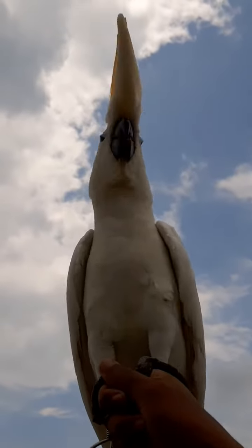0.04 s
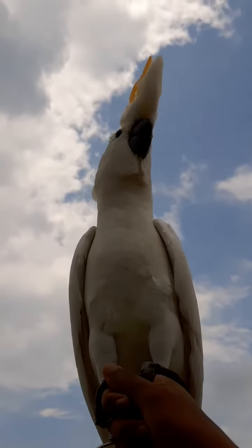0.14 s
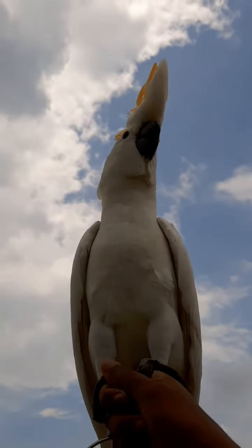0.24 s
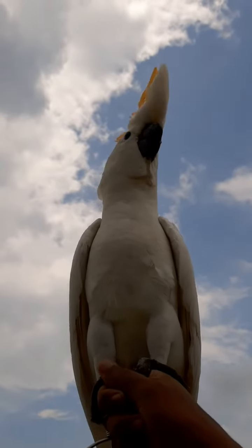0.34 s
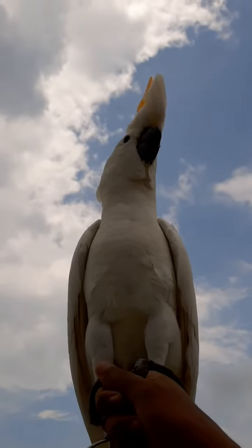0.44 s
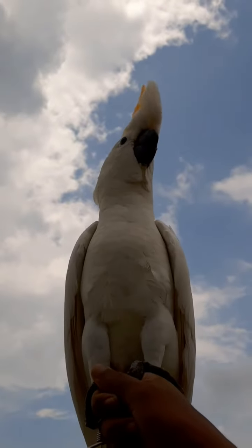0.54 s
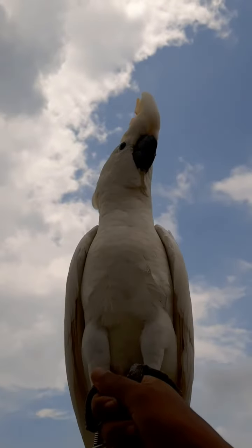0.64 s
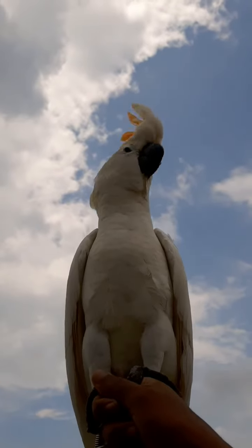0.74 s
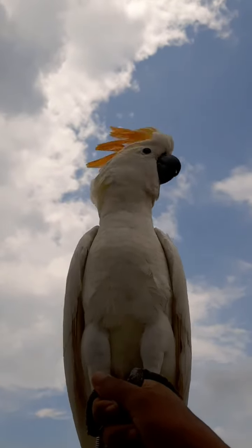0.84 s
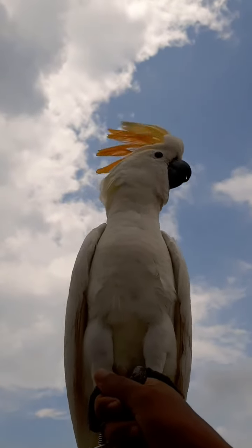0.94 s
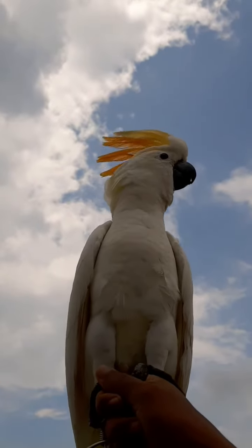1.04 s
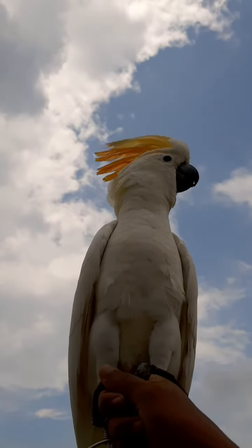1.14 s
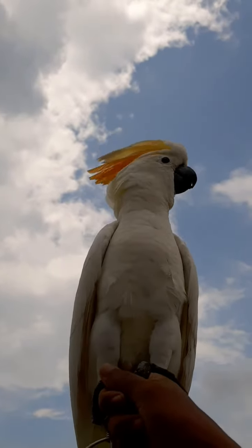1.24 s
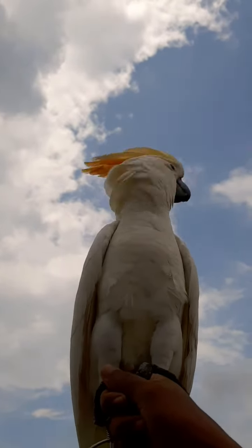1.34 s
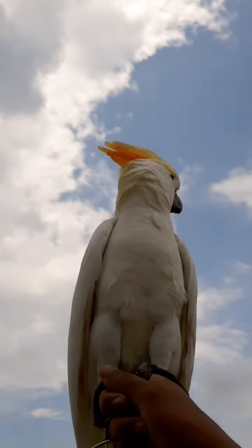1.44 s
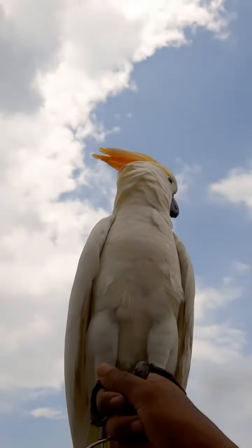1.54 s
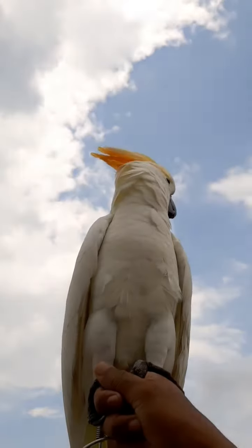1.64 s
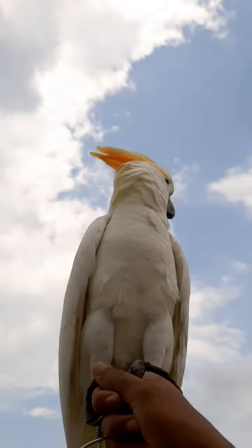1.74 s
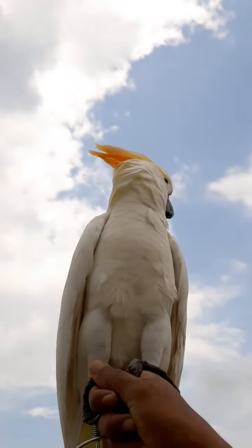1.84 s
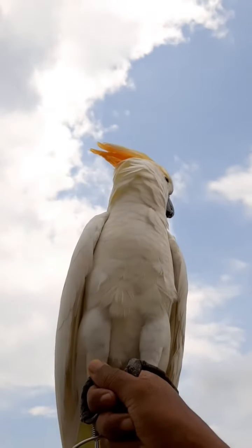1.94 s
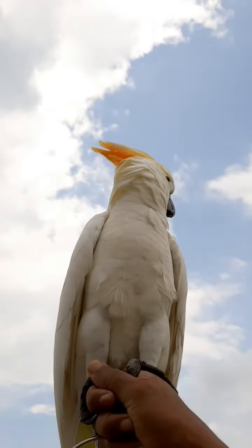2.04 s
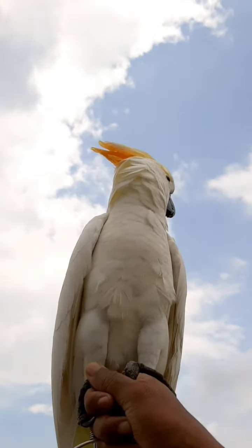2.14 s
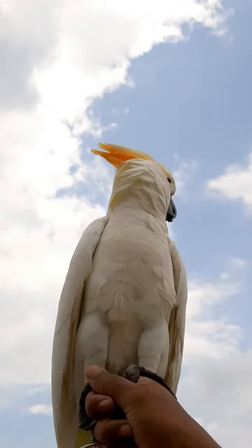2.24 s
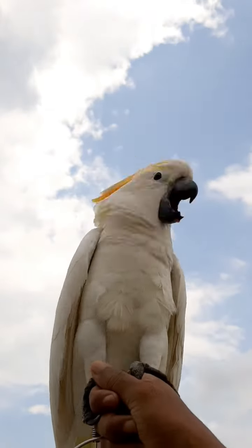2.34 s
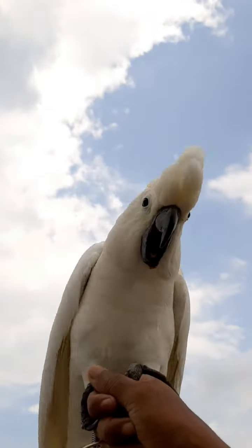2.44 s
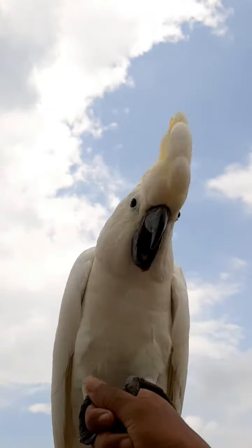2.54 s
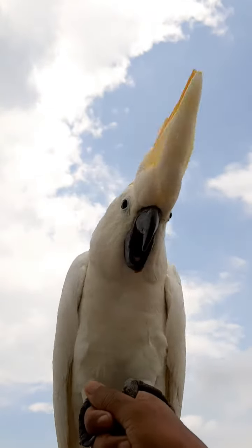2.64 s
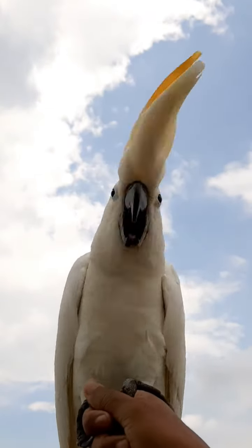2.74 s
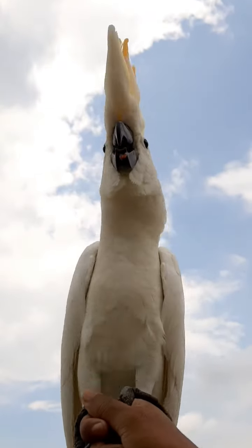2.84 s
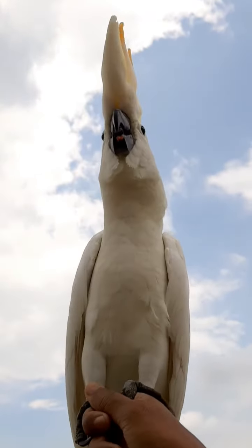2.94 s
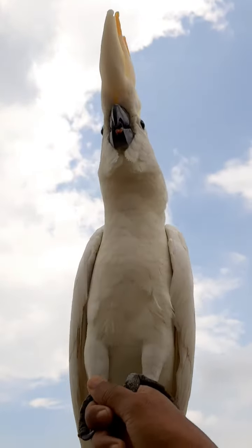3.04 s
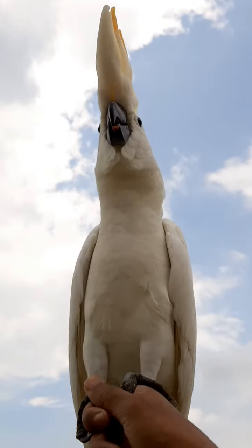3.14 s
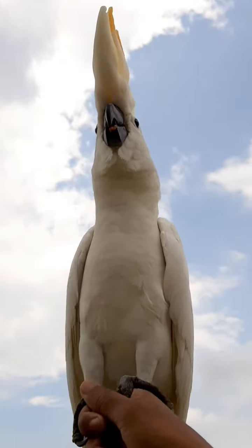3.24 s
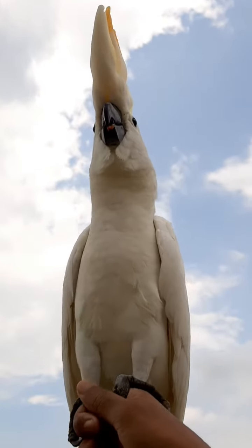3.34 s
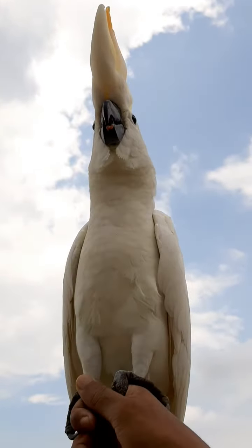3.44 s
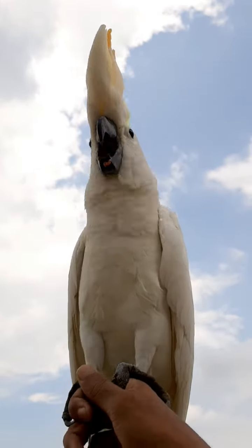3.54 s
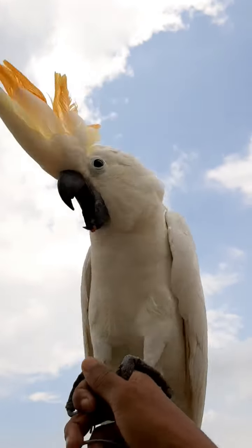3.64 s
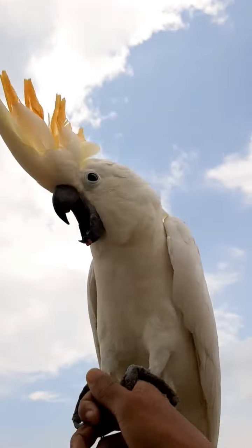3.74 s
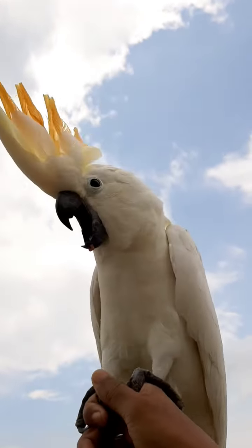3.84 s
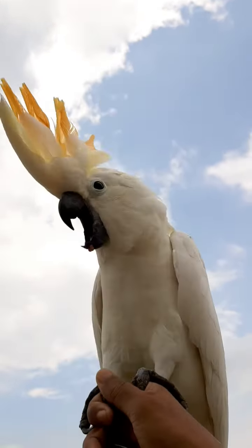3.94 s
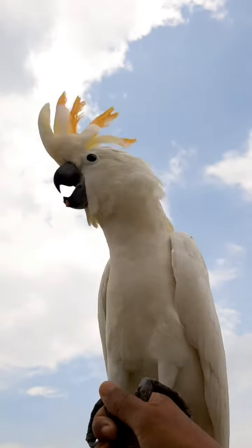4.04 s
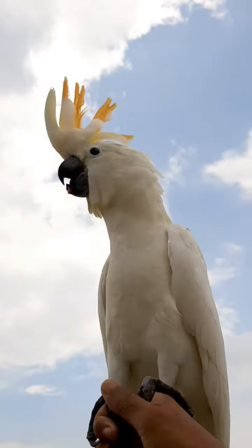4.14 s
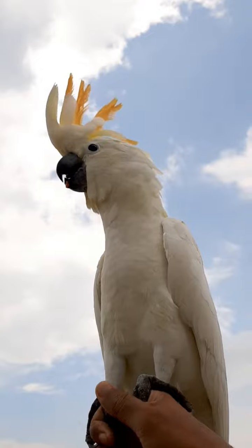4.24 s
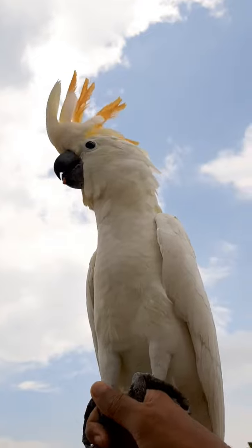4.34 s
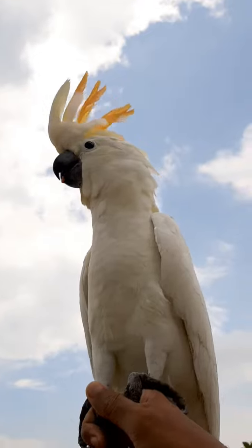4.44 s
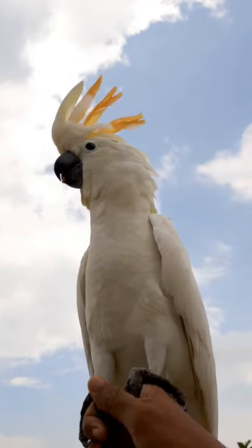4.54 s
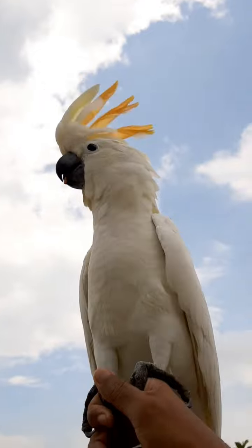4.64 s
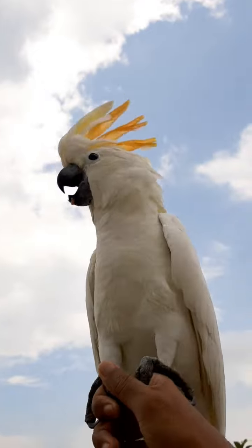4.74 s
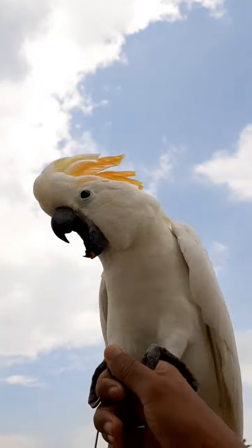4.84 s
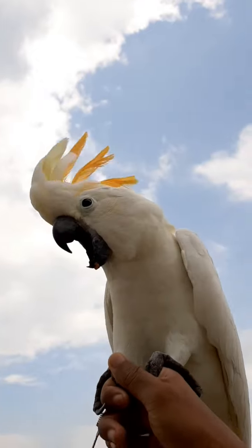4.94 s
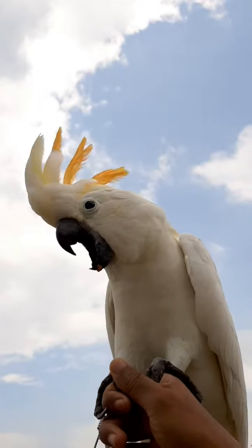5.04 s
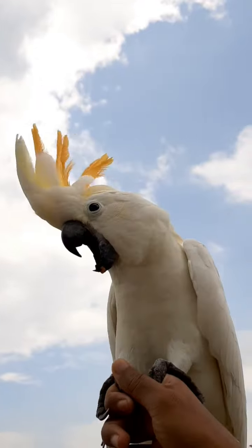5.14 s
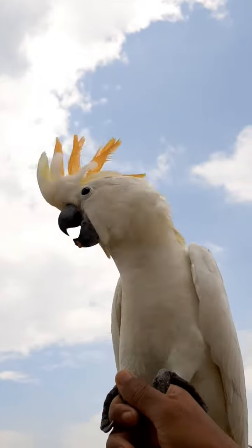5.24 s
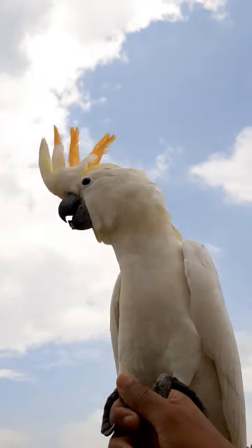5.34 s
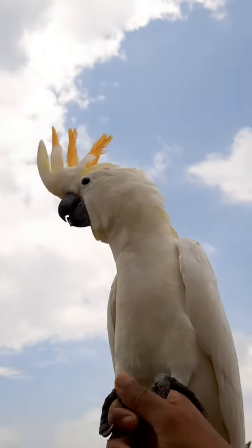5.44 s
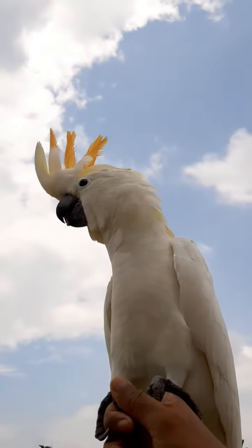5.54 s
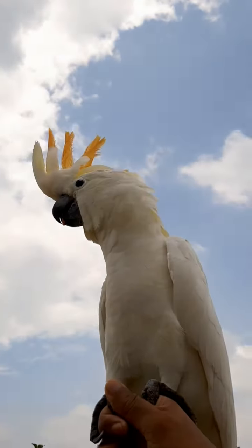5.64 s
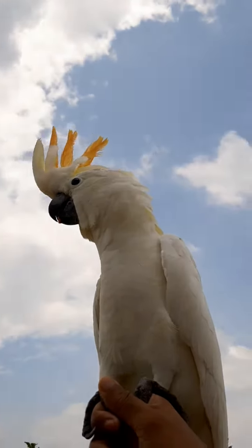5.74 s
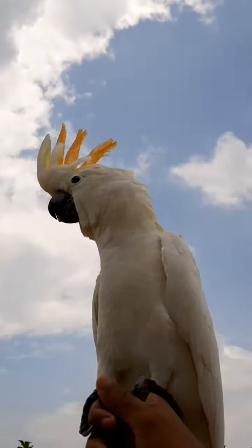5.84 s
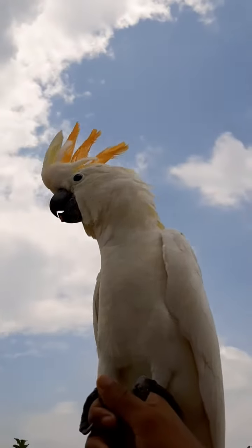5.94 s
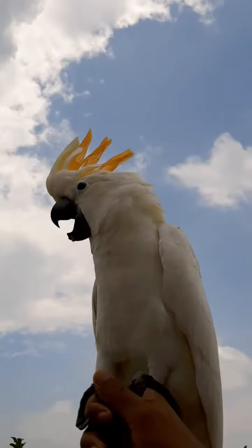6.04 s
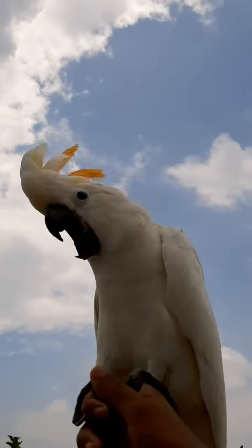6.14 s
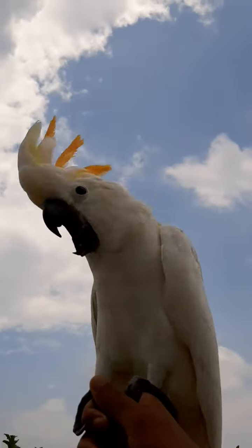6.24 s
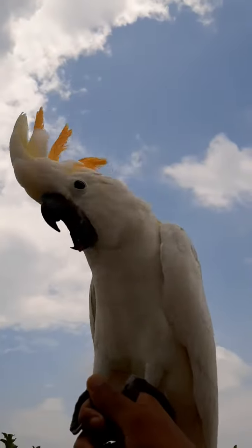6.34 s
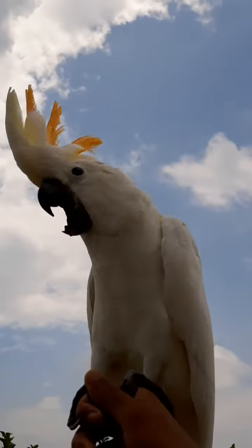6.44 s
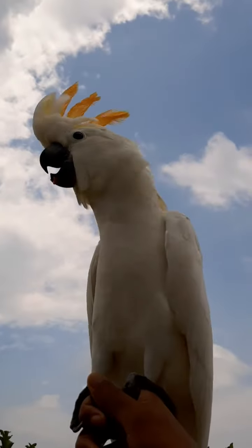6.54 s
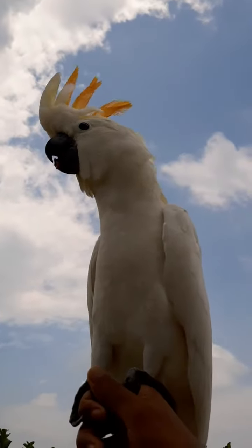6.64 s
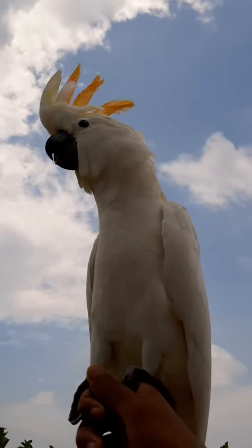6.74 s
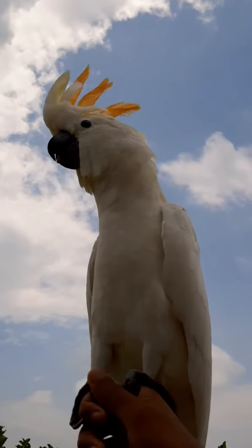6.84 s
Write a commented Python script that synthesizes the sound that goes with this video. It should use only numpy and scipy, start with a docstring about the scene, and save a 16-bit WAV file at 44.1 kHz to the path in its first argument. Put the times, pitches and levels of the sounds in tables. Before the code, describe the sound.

Four loud, shrill cockatoo screeches come at a steady pace outdoors, with thin birdsong far behind.

```python
"""Cockatoo screaming outdoors

A cockatoo on a hand screams four times, close to the microphone: its syrinx warbles and tears into a
rasp at every pitch dip. Each rasp shakes a low rumble out of the microphone ports, and nearby walls
answer briefly. Behind it sit thin whistles, chips and wheezes of small birds, two far hoots, a soft
knock and a quiet bed of outdoor air."""
import sys
import numpy as np
from scipy import signal
from scipy.fft import rfft, irfft, next_fast_len
from scipy.io import wavfile
from scipy.ndimage import map_coordinates

SR = 44100
rng = np.random.default_rng(int(sys.argv[2]) if len(sys.argv) > 2 else 0)


def master_out(mix):
    """Clip the mix to full scale and print it as 16-bit PCM to the path in sys.argv[1]."""
    frames = np.transpose(np.atleast_2d(mix))
    ceiling = np.clip(frames, -1, 1)
    pcm = np.round(ceiling * 32767).astype(np.int16)
    wavfile.write(sys.argv[1], SR, pcm)


N = 303408
T = np.arange(N) / SR

# fader rides of the air bed: (time [s], drone level [dB], rustle level [dB])
AIR_LEVELS = [(0, -68, -64.5), (1.0, -67, -62), (2.45, -58, -51), (2.9, -69, -61), (3.5, -69.5, -59),
              (4.6, -65.5, -63.5), (6.88, -71.5, -64)]
# colours of the air bed's three layers: (frequency [Hz], relative level [dB])
DRONE_COLOUR = [(20, -28), (40, -22), (66, 4), (95, 0), (330, -12), (650, -38)]
RUSTLE_COLOUR = [(200, -6), (400, 2.5), (850, -1.5), (1500, -5.5), (2600, -11.5), (4300, -9), (9000, -35)]
HISS_COLOUR = [(1500, -29), (4000, -9.5), (6500, -4), (9000, -25.5), (12500, -8.5)]
# modes of the knock: (frequency [Hz], level [dB], t60 [s])
KNOCK_MODES = [(503, -46, 0.025), (1020, -29.5, 0.0035), (1400, -40.5, 0.019), (3700, -41.5, 0.0052)]
# far hoots: (time [s], length [s], starting pitch [Hz], crest level [dB])
FAR_HOOTS = [(1.479, 0.78, 675, -56), (3.05, 0.46, 751, -65.5)]
# whistled phrases: (time [s], notes [count], note spacing [s], pitch [Hz], base level [dB])
WHISTLE_PHRASES = [(0, 2, 0.11, 7290, -60.5), (.421, 3, 0.13, 7280, -60.5), (1.179, 3, .14, 7340, -64),
                   (2.189, 2, 0.15, 6756, -53), (2.879, 5, 0.17, 7273, -58.5),
                   (4.228, 5, .155, 7290, -62.5), (5.438, 5, .172, 7240, -63), (6.7, 1, 0.11, 7150, -63.5)]
# pairs of short arched chips: (time [s], level [dB])
CHIP_PAIRS = [(.36, -76.5), (.77, -72), (1.175, -67.5), (1.595, -64), (2.02, -64)]
# wheezy far calls: (time [s], length [s], pitch [Hz], fall [share of pitch], base level [dB])
WHEEZE_CALLS = [(1.145, 0.54, 4070, 0.0062, -59.5), (1.148, .18, 5320, .02, -63),
                (1.18, 0.41, 8200, 0.039, -66.5), (1.34, .25, 6100, 0.068, -67),
                (5.425, .48, 4280, 0.00017, -60), (5.855, .34, 4250, .058, -60),
                (6.095, 0.19, 3500, -.2, -52)]
# decay of the outdoor tail: (frequency [Hz], t60 [s])
YARD_DECAY = [(200, .25), (2500, 0.57), (6000, 0.61), (12000, 0.58)]
# EQ on the voice sent to the wall echo: (frequency [Hz], gain [dB])
WALL_SEND_EQ = [(2200, -0.5), (2700, -4.5), (3350, -12.5), (3800, -1), (4300, -2)]
# narrow resonances of things near the microphone: (frequency [Hz], gain [dB])
NEAR_RESONANCES = [(2036, 5.5), (2269, 4.5), (3213, -30.5), (3716, -4.5), (4626, -16.5), (5137, 6)]
# balance of the microphone ports: (frequency [Hz], left minus right [dB])
PORT_BALANCE = [(200, 3.5), (1500, 0.5), (2300, -4.5), (2850, -7.5), (3300, 0), (4000, 3.5), (5700, -2.5),
                (6700, -1), (7400, 9), (8100, 20.5), (10000, -0.5)]
# phase of the direct sound at the ports: (frequency [Hz], left lead [rad])
PORT_PHASE = [(1500, 0.22), (2050, 0.52), (2300, 1.97), (2700, 2.22), (3150, 3), (3700, 2.96), (4300, 3.6),
              (5000, 1.12), (5500, 2.9), (6500, 2.23)]
# sound that reaches the ports off the hand and body: (frequency [Hz], share of power [0-1])
SCATTER_SHARE = [(1500, 0.11), (3300, 0.017), (4600, 0.58), (5600, 0.12), (7000, 0.68), (12000, 1)]
# colour of the ports' rumble: (frequency [Hz], relative level [dB])
RUMBLE_COLOUR = [(20, -20.5), (70, -1), (250, -3.5), (500, -10.5), (1000, -15), (1800, -32)]
# formants of the throat and open beak: (frequency [Hz], relative level [dB])
THROAT_FORMANTS = [(450, -31), (750, -13.5), (1150, -16), (1500, -6), (1850, -9), (2400, -4.5), (2750, 6),
                   (3050, 3), (3550, -1.5), (4200, -3.5), (4650, -14), (5300, -8), (5900, -7), (6450, -12),
                   (7200, -12.5), (8700, -33), (12000, -19.5)]
# the screams; break and crest count from each one's start: (time [s], length before release [s],
# base level [dB], opening pitch [Hz], attack [s], break into rasp [s], first warble crest [s],
# warble rate [Hz], opening roughness [0-1], closing roughness [0-1])
SCREAM_CUES = [(2.479, 0.38, -15.5, 1437, 0.022, 0.099, 0.12, 11.7, .16, 0.38),
               (3.719, .36, -16, 1526, 0.031, 0.039, 0.098, 11.2, 0.27, 0.3),
               (4.944, .373, -16, 1506, 0.043, .05, .117, 11, 0.47, 0.36),
               (6.194, 0.37, -17, 1430, 0.049, .045, 0.11, 11.25, 0.38, 0.59)]


def amp(db):
    """Decibels to gain."""
    return 10 ** (np.asarray(db) / 20)


def unit(x):
    """Scale to rms 1."""
    return x / np.sqrt(np.mean(x ** 2) + 1e-20)


def ramp(t, length):
    """Rise from 0 to 1 as t goes from 0 to length."""
    return np.clip(t / length, 0, 1)


def along(points, hz):
    """Read (frequency, value) points on a log axis."""
    f, v = np.transpose(points)
    return np.interp(np.log(hz + 1), np.log(f + 1), v)


def wobble(rate, t):
    """A smooth random curve with rate knots a second."""
    at = (t - t[0]) * rate
    return map_coordinates(rng.standard_normal(int(at[-1]) + 4), [at], mode="mirror")


def running_phase(hz):
    """Phase in radians of a gliding frequency."""
    return 2 * np.pi * np.cumsum(hz) / SR


def filtered(x, response):
    """Pass x through a frequency response."""
    n = x.shape[-1]
    m = next_fast_len(n + 8192)
    return irfft(rfft(x, m) * response(np.fft.rfftfreq(m, 1 / SR)), m)[..., :n]


def coloured(x, spectrum):
    """Shape x with an EQ curve, then scale to rms 1."""
    return unit(filtered(x, lambda hz: amp(along(spectrum, hz))))


def add(track, start, x):
    """Mix x into track from start seconds on."""
    part = track[..., max(round(start * SR), 0):][..., :x.shape[-1]]
    part += x[..., :part.shape[-1]]


def air(drone_trim_db=1, hiss_db=-73, width=0.85):
    """The bed: a low distant drone, a rustle that swells before the first scream, a faint hiss."""
    times, drone_db, rustle_db = np.transpose(AIR_LEVELS)
    noise = lambda colour: coloured(rng.standard_normal(N) + width * rng.standard_normal((2, N)), colour)
    drone = amp(np.interp(T, times, drone_db) + drone_trim_db + wobble(6.7, T)) * noise(DRONE_COLOUR)
    rustle = amp(np.interp(T, times, rustle_db) + wobble(10, T)) * noise(RUSTLE_COLOUR)
    return drone + rustle + amp(hiss_db) * noise(HISS_COLOUR)


def knock(start=.631):
    """A soft, dead knock close to the microphone: four heavily damped modes."""
    t = T[:SR // 10]
    out = np.zeros(N)
    modes = sum(amp(db - 60 * t / t60) * np.sin(2 * np.pi * hz * t) for hz, db, t60 in KNOCK_MODES)
    add(out, start, modes)
    return out


def hoots(octave_db=-9, swell_db=12, fall_hz_per_s=100):
    """Far, slowly sinking tones with a weak octave, each swelling and fading."""
    out = np.zeros(N)
    for start, length, hz, db in FAR_HOOTS:
        t = np.arange(0, length, 1 / SR)
        phase = running_phase((hz - fall_hz_per_s * t) * (1 + 0.005 * wobble(39, t)))
        level = amp(db + swell_db * (np.sin(np.pi * t / length) - 1) + 2 * wobble(23.7, t))
        add(out, start, level * unit(np.sin(phase) + amp(octave_db) * np.sin(2 * phase)))
    return out


def yard(x, near_db, far_db, near_t60=0.033):
    """Outdoor reverb, wet only: quick close reflections and a faint tail that dies band by band."""
    hz, t, bands = signal.stft(rng.standard_normal((2, SR // 2)), SR, nperseg=256)
    tail = signal.istft(bands * amp(-60 * t / along(YARD_DECAY, hz)[:, None]), SR, nperseg=256)[1]
    near = rng.standard_normal(tail.shape) * amp(-60 * T[:tail.shape[1]] / near_t60)
    impulse = amp(near_db) * near / np.linalg.norm(near[0])
    impulse += amp(far_db) * tail / np.linalg.norm(tail[0])
    return signal.fftconvolve(x[None], impulse, axes=1)


def bird_note(length, hz, fall, arch, tremble=.015):
    """A small bird's note: a gliding, trembling sine under a smooth swell."""
    t = np.arange(0, length, 1 / SR)
    progress = t / length
    glide = fall * (.5 - progress) + arch * (np.sin(np.pi * progress) - 1)
    pitch = hz * (1 + glide + tremble * wobble(700, t))
    return unit(np.sin(running_phase(pitch)) * np.sin(np.pi * progress ** 0.52))


def small_birds(first_note_hz=325, first_note_db=-2.5, chip_gap_s=.145):
    """Falling whistles and wheezes scattered by the trees, and dry pairs of chips."""
    out = np.zeros((2, N))
    for start, notes, spacing, hz, db in WHISTLE_PHRASES:
        for k in range(round(notes)):
            first = k == 0  # a phrase opens higher and softer
            note = bird_note(.18, hz + first_note_hz * first, fall=.07, arch=0)
            note *= amp(db + first_note_db * first)
            add(out, start + k * spacing - .015, yard(note, near_db=0, far_db=-2.5))
    for start, db in CHIP_PAIRS:
        for delay in (0, chip_gap_s):
            add(out, start + delay, amp(db) * bird_note(.055, 3850, fall=.22, arch=.22))
    for start, length, hz, fall, db in WHEEZE_CALLS:
        wheeze = bird_note(length, hz, fall, arch=0.047, tremble=0.0302)
        add(out, start, amp(db) * yard(wheeze, near_db=-4.5, far_db=-8))
    return out


def ringing(x, width_hz=20):
    """Narrow resonances pick up the passing overtones and hold them briefly."""
    peak = lambda hz, centre: 1j * hz * width_hz / (centre ** 2 - hz ** 2 + 1j * hz * width_hz)
    bank = lambda hz: sum(amp(db) * peak(hz, centre) for centre, db in NEAR_RESONANCES)
    return filtered(np.pad(x, (0, SR // 5)), bank)


def ports(x, scatter_t60=0.036):
    """Each microphone port gives the bird its own colour and phase; the treble arrives scattered."""
    bounces = rng.standard_normal((2, SR // 10)) * amp(-60 * T[:SR // 10] / scatter_t60)
    bounces /= np.linalg.norm(bounces, axis=1, keepdims=True)

    def response(hz):
        sides = np.array([[.5], [-.5]])
        gain = amp(sides * along(PORT_BALANCE, hz))
        gain /= np.sqrt(np.mean(gain ** 2, axis=0))
        share = np.clip(along(SCATTER_SHARE, hz), 0, 1)
        direct = np.exp(1j * sides * along(PORT_PHASE, hz))
        scattered = rfft(bounces, 2 * (len(hz) - 1))
        return gain * (np.sqrt(1 - share) * direct + np.sqrt(share) * scattered)
    return filtered(x, response)


def port_rumble(t, level, rough, left_db=-2.5, right_db=-9):
    """The rasp shakes low, lumpy noise out of the microphone ports."""
    thumps = rng.standard_normal((2, len(t))) * amp(2 * wobble(300, t))
    overload = np.clip((t - t[0] - .04) / 0.064, 0.03, 1)  # builds up just after the attack
    return amp([[left_db], [right_db]]) * level * rough ** 2.15 * overload * coloured(thumps, RUMBLE_COLOUR)


def scream_gesture(length, base_db, opening_hz, attack, break_at, crest_at, rate, open_rough, end_rough):
    """Pitch, level and roughness: a rising tone breaks into a rasping warble, settles and is let go."""
    scoop_hz, scoop_s, rise_hz_per_s = 139.9, .02, 600
    warble_hz, swing_hz, warbles, uneven = 1508, 134.8, 2.6, 0.202
    closing_hz, sag_hz_per_s = 1465, 3000
    catch_s, break_s, settle_s, release_s = 0.0363, .025, .028, .04
    catch_rough, crest_rough, dip_rough = .85, .52, 0.833
    onset_db, stutter_db, stutter_s, release_db_per_s = -18.5, 10, .003, 704.5
    clean_db, surge_db, waver_hz, waver_db = 5.5, 0.5, 12.04, 1.08

    t = np.arange(-.012, length + release_s, 1 / SR)
    swing = np.cos(2 * np.pi * (t - crest_at) * rate)
    caught = ramp(t - catch_s / 2, catch_s / 2)
    broken = ramp(t - break_at + break_s / 2, break_s)
    settled = ramp(t - crest_at - warbles / rate, settle_s)
    since_release = np.maximum(t - length, 0)

    def stages(opening, warble, closing):
        """Crossfade through the three parts of the scream."""
        return (1 - settled) * ((1 - broken) * opening + broken * warble) + settled * closing

    hz = stages(opening_hz - scoop_hz * np.exp(-np.maximum(t, 0) / scoop_s) + rise_hz_per_s * t,
                warble_hz + swing_hz * swing * (1 + uneven * wobble(rate, t)),
                closing_hz - sag_hz_per_s * since_release)  # sinks as the pressure goes
    hz += waver_hz * wobble(60, t)
    rough = stages(catch_rough + (open_rough - catch_rough) * caught,
                   dip_rough + (crest_rough - dip_rough) * (1 + swing) / 2,
                   end_rough)
    db = base_db + onset_db * (1 - ramp(t, attack)) ** 2 - release_db_per_s * since_release
    db -= stutter_db * np.exp(-(t / stutter_s) ** 2)  # the voice catches after its first puff
    db += clean_db * (.5 - rough)  # a clean tone is louder than a rasp
    db -= surge_db * stages(0, swing, 0)  # a small push at each pitch dip
    db += waver_db * wobble(50.2, t)
    return t, hz, db, rough


def syrinx(t, hz, db, rough, undertone_db=-8, lock_hz=1440, split=2.3, rattle_hz=220, slack_db=-22):
    """The raw voice: two sets of membranes and their breath noise, shaped by throat and beak."""
    # the harder the membranes are driven, the less alike their cycles
    jitter = rough ** 2 * (.028 * wobble(900, t) + .02 * wobble(280, t))
    main = running_phase(hz * (1 + jitter))
    # the other side is locked an octave below, and breaks away upwards at high pitch
    breakaway_hz = split * np.maximum(hz - lock_hz, 0) * np.clip(2.5 * rough - .3, 0, 1)
    other = main / 2 + running_phase(breakaway_hz + 50 * rough * wobble(300, t))

    def torn(phase, k):
        """A partial that swells and slips on its own; high ones slip more."""
        swell = amp(3.5 * rough * wobble(240, t))
        slip = .45 * k ** 1.35 * rough * wobble(330, t)
        return swell * np.cos(phase + slip)

    # overtones of the main side, and their sum tones with the other
    other_gain = amp(undertone_db) + .4 * rough
    partials = sum(torn(k * main + main, k)
                   + other_gain * torn(k * main + other, k)
                   + .5 * rough * torn(k * main + 2 * other, k) for k in range(9))
    tone = coloured(partials, THROAT_FORMANTS)
    # turbulent air escapes in puffs; its hiss differs from port to port
    hiss = rng.standard_normal(len(t)) + rng.standard_normal((2, len(t)))
    breath = coloured(hiss * (1 + 0.46 * np.cos(other)), THROAT_FORMANTS)
    # at the start and end the pressure is too low for a steady tone
    slack = ramp(slack_db - db, 10)
    breath_share = np.maximum(.2 * rough ** 2, .7 * slack) + .001
    # an uneven rattle splits every overtone into a cluster
    rattle_phase = running_phase(rattle_hz * (1 + .3 * wobble(120, t)))
    rattle = unit(1 + .8 * rough ** 2 * np.cos(rattle_phase))
    return rattle * (np.sqrt(1 - breath_share) * tone + np.sqrt(breath_share) * breath)


def cockatoo(fade_s=0.0097):
    """Four close screams, each with its own randomly drawn brief reflections."""
    out = np.zeros((2, N))
    for cue, *manner in SCREAM_CUES:
        t, hz, db, rough = scream_gesture(*manner)
        level = amp(db) * ramp(np.minimum(t - t[0], t[-1] - t), fade_s)
        voice = level * syrinx(t, hz, db, rough)
        rumble = port_rumble(t, level, rough)
        start = cue + t[0]
        add(out, start, ports(voice) + rumble)
        # the echo gets a flatter voice, with the shrill band near 3 kHz turned down
        wall_send = filtered(voice[0], lambda hz: amp(along(WALL_SEND_EQ, hz)))
        add(out, start, yard(wall_send, near_db=-6, far_db=-21, near_t60=0.048))
        add(out, start, ringing(voice[0]))
    return out


def scene():
    """The cockatoo up front, its surroundings well behind."""
    return cockatoo() + small_birds() + hoots() + knock() + air()


def record(dry, ceiling=0.71, cutoff_hz=13100):
    """The microphone rounds off the highest peaks; a steep low-pass takes off the top."""
    rounded = dry / (1 + (dry / ceiling) ** 4) ** (1 / 4)
    return filtered(rounded, lambda hz: 1 / (1 + (hz / cutoff_hz) ** 200))


dry = scene()
out = record(dry)
master_out(out)
```